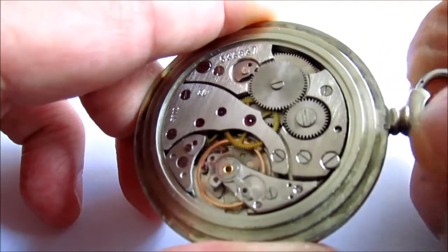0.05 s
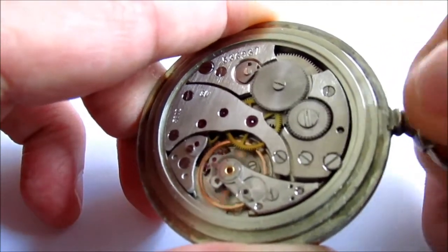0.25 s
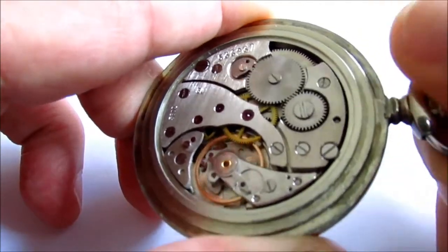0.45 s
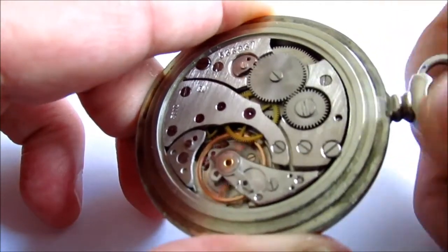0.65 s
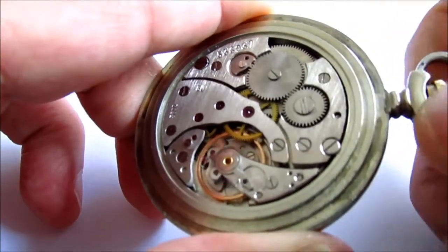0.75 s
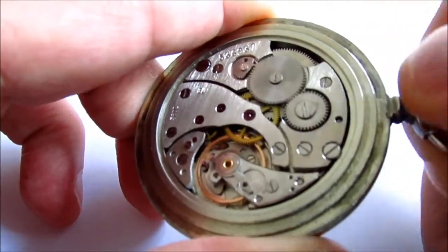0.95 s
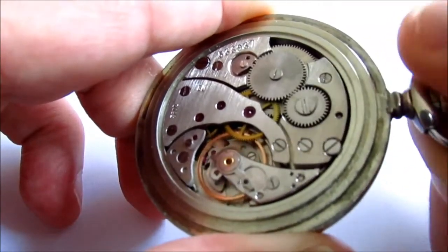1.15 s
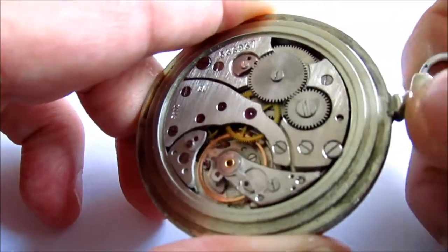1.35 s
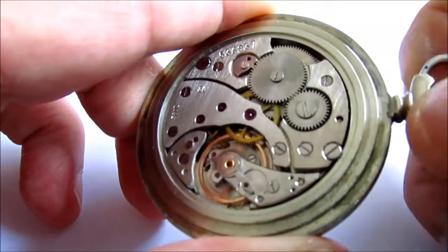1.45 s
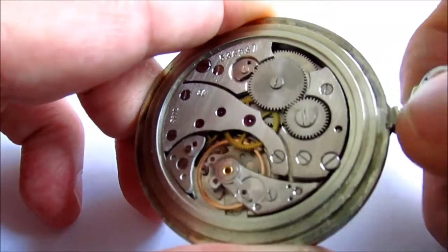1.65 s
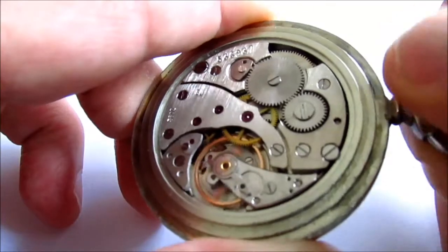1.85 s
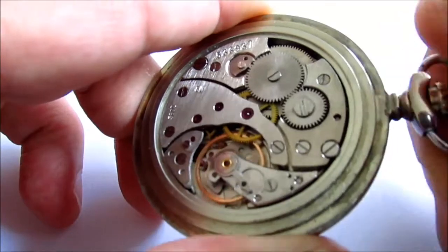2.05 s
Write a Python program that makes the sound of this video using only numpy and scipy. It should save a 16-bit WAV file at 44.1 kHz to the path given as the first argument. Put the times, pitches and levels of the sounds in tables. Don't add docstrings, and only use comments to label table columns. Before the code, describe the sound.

Rapid ratcheting clicks of a pocket watch crown being wound to and fro, close in a quiet room

```python
import sys
import numpy as np
from scipy import signal
from scipy.fft import rfft, irfft
from scipy.io import wavfile
from scipy.ndimage import uniform_filter1d

SR = 44100
rng = np.random.default_rng(int(sys.argv[2]) if len(sys.argv) > 2 else 0)


def inscribe(sig):
    pcm = np.round(np.clip(np.atleast_2d(sig).T, -1, 1) * 32767)
    wavfile.write(sys.argv[1], SR, pcm.astype(np.int16))


def nominal_scale(level):
    x = np.asarray(level, float) / 20
    return 10 ** x


N = 92610

STRIKE_LEN = 1600
LEAD_S = 0.002
PLATE_T60_S = 0.0013
RING_HZ = 6860


def rms_one(x):
    return x / np.sqrt(np.mean(x ** 2) + 1e-20)


def at_hz(points, hz):
    p = np.array(points)
    return np.interp(np.log(hz), np.log(p[:, 0]), p[:, 1])


def swell(rows):
    return nominal_scale(np.interp(np.arange(N) / SR, *np.transpose(rows)))


def butter(x, order, hz, kind):
    return signal.sosfilt(signal.butter(order, hz, kind, fs=SR, output="sos"), x)


def soft_top(x):
    return signal.sosfilt(signal.cheby2(12, 40, 16100, fs=SR, output="sos"), x)


def ring(x, hz, t60_s):
    r = nominal_scale(-60 / (t60_s * SR))
    w = 2 * np.pi * hz / SR
    return signal.lfilter([0, np.sin(w)], [1, -2 * r * np.cos(w), r * r], x)


# freq_hz, correlation [-1..1]
LIKENESS = [(60, 0.72), (125, 0.86), (250, 0.84), (500, -0.34), (1000, -0.51), (2000, 0.31), (5000, 0.71),
            (12000, 0.34)]


def coloured(spectrum, alike=None):
    hz = np.arange(1, N // 2 + 2) * SR / N
    alike = np.clip(at_hz(LIKENESS, hz) if alike is None else alike, -1, 1)
    inside = (hz > spectrum[0][0]) & (hz < spectrum[-1][0])
    mid, side = rfft(rng.standard_normal((2, N))) * nominal_scale(at_hz(spectrum, hz)) * inside
    mid = irfft(mid * np.sqrt(1 + alike), N)
    side = irfft(side * np.sqrt(1 - alike), N)
    return rms_one(np.array([mid + side, mid - side]))


# freq_hz, density_db_per_hz
AIR = [(76, -49), (130, -4.5), (377, -3), (465, -6.5), (884, -7), (1310, -13), (1600, -14.5), (2500, -23.5),
       (3250, -96), (5500, -120)]
# time_s, level_db
AIR_SWELL = [(0, 2.5), (.1, 1.5), (.3, 2), (.45, 2), (.65, 1.5), (.85, 1.5), (1, 2), (1.2, 4), (1.3, 3),
             (1.55, 4.5), (1.75, 5), (1.95, 3.5), (2.1, 5.5)]


def room_tone():
    return swell(AIR_SWELL) * nominal_scale(-55.5) * coloured(AIR)


# freq_hz, level_db, t60_s
HUM = [(58.2, -70.5, 0.3), (83, -76.5, 0.42), (106.5, -63, 0.25), (146.5, -64.5, 0.091), (359, -78.5, 0.18),
       (1593, -80.5, 0.4)]
# time_s, level_db
HUM_SWELL = [(0, -20), (.4, 4.5), (.58, -2.5), (.8, -0.5), (1.2, -3.5), (1.5, 4.5), (1.92, -5.5), (2.1, 0)]
# time_s, level_db
DEEP_SWELL = [(0, -17), (.35, -1), (.55, -2), (.78, 8), (.95, 3), (1.1, 0), (1.25, -11), (1.45, -14),
              (1.6, 0), (2.1, 3)]


def ringing_modes(modes):
    low = 0
    for hz, db, t60_s in modes:
        noise = rng.standard_normal((2, N + SR))
        low = low + nominal_scale(db) * rms_one(ring(noise, hz, t60_s))
    mid, side = butter(low, 2, 45, "high")[:, SR:]
    width_db = -23.5
    return mid + nominal_scale(width_db) * side * [[1], [-1]]


def hum():
    return swell(HUM_SWELL) * ringing_modes(HUM[1:]) + swell(DEEP_SWELL) * ringing_modes(HUM[:1])


# freq_hz, density_db_per_hz
HISS = [(1350, 2), (2300, -14.5), (3400, -7.5), (5000, -16), (6500, -10), (9500, -12), (14000, -15),
        (15950, -20)]


def hiss():
    return nominal_scale(-64.5) * coloured(HISS)


def contact(contact_s):
    lead_db, lead_rise_s = -8, 0.00043
    chatter_db, chatter_s = -16.5, 0.0012
    snap = 4.5
    even_hz = 700
    t = np.arange(STRIKE_LEN) / SR - LEAD_S
    after = np.maximum(t, 0)
    shape = after / contact_s * np.exp(1 - after / contact_s)
    shape = shape + nominal_scale(chatter_db) * np.exp(-after / chatter_s) * (t > 0)
    shape = shape + nominal_scale(lead_db) * np.exp(np.minimum(t, 0) / lead_rise_s) * (t < 0)
    push = rng.standard_normal((2, t.size)) * shape
    push[0, int((LEAD_S + contact_s) * SR)] = snap
    tones = rfft(push)
    power = uniform_filter1d(abs(tones) ** 2, size=even_hz * t.size // SR)
    return irfft(tones / np.sqrt(power), t.size)


def unit(x, width_db):
    return x / np.sqrt(np.sum(x ** 2, axis=1, keepdims=True)) * [[1], [nominal_scale(width_db)]]


# freq_hz, level_db
PLATES = [(8500, -1.5), (9500, 1), (10600, 0), (12200, 3), (13700, -2.5), (15400, -6.5)]


def strike(bright_hz, ring_db, thud_db, contact_s, case_modes):
    bright_t60_s, ring_t60_s, case_t60_s = 0.002, 0.0081, 0.0051
    off_pitch_db = 1.5
    mode_spread_db, pan_db, pan_spread_db = 1.5, -0.3, 0.8
    width_db, case_width_db = -7.5, -12
    push = contact(contact_s)

    bright = ring(push, bright_hz, bright_t60_s)
    for k, (hz, db) in enumerate(PLATES):
        db = db - off_pitch_db * abs(np.log2(hz / bright_hz)) + mode_spread_db * rng.normal()
        bright = bright + (-1) ** k * nominal_scale(db) * ring(push, hz * rng.uniform(0.89, 1.03), PLATE_T60_S)
    bright = butter(bright, 3, [7300, 16200], "band")

    case = butter(ring(push, RING_HZ * rng.uniform(1.0, 1.015), ring_t60_s), 2, 6000, "high")

    thud = 0
    for k, (hz, db) in enumerate(case_modes):
        thud = thud + (-1) ** k * nominal_scale(db + mode_spread_db * rng.normal()) * ring(push, hz, case_t60_s)
    thud = butter(thud, 2, 1500, "high")

    blow = unit(bright, width_db)
    blow = blow + nominal_scale(ring_db + 4) * unit(case, case_width_db)
    mid, side = blow + nominal_scale(thud_db + 2) * unit(thud, case_width_db)
    side = butter(side - 0.063 * mid, 1, 10000, "high")
    pan = nominal_scale((pan_db + pan_spread_db * rng.normal()) * np.array([[0.5], [-0.5]]))
    return nominal_scale(9.5) * pan * np.array([mid + side, mid - side]) / np.sqrt(np.sum(mid ** 2))


# freq_hz, level_db
CASE = [(2900, 0), (3600, 0.5), (4300, 4.5), (5400, -3.5)]


def clicks(rows, contact_s, case_modes=CASE):
    out = np.zeros((2, N + STRIKE_LEN))
    for peak_s, peak_db, bright_hz, ring_db, thud_db in rows:
        i = int((peak_s - LEAD_S - contact_s - 0.0003) * SR)
        out[:, i:i + STRIKE_LEN] += nominal_scale(peak_db) * strike(bright_hz, ring_db, thud_db, contact_s, case_modes)
    return out[:, :N]


# peak_s, peak_db
TEETH = [(0.0565, -50), (0.2717, -36), (0.2841, -35), (0.2875, -36), (0.2966, -30), (0.3038, -38),
         (0.3307, -35), (0.3332, -28), (0.3528, -33), (0.356, -35), (0.3575, -38), (0.3785, -38),
         (0.4025, -39), (0.3752, -34), (0.3997, -36), (0.453, -34), (0.4651, -40), (0.5496, -45),
         (0.6075, -27), (0.6155, -46), (0.6341, -41), (0.6428, -36), (0.6471, -27), (0.6563, -42),
         (0.6768, -36), (0.6846, -31), (0.9293, -32)]
# peak_s, peak_db
TEETH_LATE = [(0.9343, -36), (0.9375, -33), (0.9515, -29), (0.9541, -36), (0.9751, -37), (1.005, -29),
              (1.0301, -38), (1.051, -38), (1.1992, -46), (1.3161, -42), (1.3424, -37), (1.3896, -45),
              (1.4024, -45), (1.625, -45), (1.7183, -39), (1.7213, -34), (1.733, -36), (1.7431, -39),
              (1.7585, -38), (1.7861, -38), (1.8458, -36), (1.8645, -39), (2.0909, -42)]


def tooth_touches():
    bright_hz, ring_db, thud_db = 11500, -13.5, -16
    rows = [(s, db, bright_hz, ring_db, thud_db) for s, db in list(TEETH) + list(TEETH_LATE)]
    return clicks(rows, contact_s=0.00025)


# peak_s, peak_db, bright_hz, ring_db, thud_db
BACK = [(0.1138, -36.5, 11440, -14, -27), (0.5808, -26, 11500, -9, -40), (0.6052, -24.5, 11300, -8.5, -19),
        (0.6269, -23.5, 11500, -10, -23), (0.6458, -26.5, 10100, -1.5, -26), (0.6599, -28.5, 9200, -8, -34),
        (0.6817, -25.5, 11700, -13.5, -40), (0.8599, -30.5, 12600, -25, -42),
        (1.2443, -22.5, 8100, -10.5, -30), (1.2691, -24.5, 12700, -4, -14.5), (1.2854, -27, 13000, -2, -21),
        (1.302, -25, 8200, -15, -26), (1.3188, -22.5, 11100, -4, -23), (1.3391, -27.5, 11500, -16, -20),
        (1.3928, -21.5, 7700, -3, -29), (1.4935, -22.5, 11700, -7, -41), (2.0295, -36.5, 11300, -4, -9.5),
        (2.058, -42, 11800, -15, -15), (2.0934, -36, 8240, -11, -15.5)]


def pinion_skips():
    return clicks(BACK, contact_s=0.00035)


# start_s, end_s, level_db
TURNS = [
    (0.225, 0.427, -74),
    (0.59, 0.727, -61.5),
    (0.845, 1.073, -58.5),
    (1.264, 1.39, -57),
    (1.59, 1.676, -61),
    (1.694, 1.887, -55.5),
]


def rustle():
    grains_per_s, spread_db, rise_s, fall_s = 800, 4.5, 0.015, 0.047
    t = np.arange(N) / SR
    moving = 0
    for start_s, end_s, db in TURNS:
        gate = np.minimum((t - start_s) / rise_s, (end_s - t) / fall_s)
        moving = moving + nominal_scale(db) * np.clip(gate, 0, 1)
    hits = rng.random((2, N)) < grains_per_s / SR
    force = nominal_scale(spread_db * np.minimum(rng.exponential(1, (2, N)), 4))
    grains = hits * force * rng.choice([-1, 1], (2, N))
    body = 0
    for k, (hz, db) in enumerate([(RING_HZ, -2)] + list(PLATES)):
        body = body + (-1) ** k * nominal_scale(db) * ring(grains + 1e-18, hz, PLATE_T60_S)
    body = butter(body + 0.5 * body[::-1], 3, 6000, "high")
    return soft_top(moving * rms_one(body))


# peak_s, peak_db, bright_hz, ring_db, thud_db
WIND = [(0.2349, -16, 10500, -16, -51), (0.2439, -20, 10900, -10, -29), (0.2513, -12.5, 11600, -23, -44),
        (0.2599, -14.5, 12100, -27, -39), (0.2741, -17, 11500, -13, -26), (0.2938, -14, 12300, -22, -44),
        (0.3207, -14.5, 9240, -16, -46), (0.3426, -13, 12000, -31, -49), (0.3651, -14.5, 12300, -19.5, -42),
        (0.3895, -13.5, 11750, -16.5, -28), (0.9034, -18.5, 9200, -11.5, -28),
        (0.9115, -15.5, 8900, -37, -32.5), (0.9242, -14.5, 12700, -18.5, -50),
        (0.9409, -15.5, 10100, -30, -25), (0.9619, -14.5, 11800, -17, -36), (0.9935, -14, 11600, -14, -28),
        (1.0194, -14.5, 9200, -20, -25.5), (1.041, -15.5, 8470, -13.5, -24.5),
        (1.7081, -14.5, 12600, -17.5, -33), (1.7229, -18, 10500, -10, -25.5),
        (1.7353, -16.5, 12450, -27, -23), (1.7483, -22, 11100, -6, -21), (1.776, -14.5, 10700, -15, -25.5),
        (1.8357, -14, 9060, -12.5, -23)]


def ratchet_clicks():
    return clicks(WIND, contact_s=0.00016)


# peak_s, peak_db, bright_hz, ring_db, thud_db
STOPS = [
    (0.4541, -21.5, 10400, -8.5, -11.5),
    (1.1318, -21.5, 10800, -6, -8),
]
# freq_hz, level_db
STOP_CASES = [
    [(1750, 0), (2550, -0.5), (3950, 5), (5600, -12)],
    [(2600, -7), (3300, -1), (4100, -2), (5000, -8)],
]


def stem_stops():
    return sum(clicks([row], 0.0006, modes) for row, modes in zip(STOPS, STOP_CASES))


def room(x):
    t60_s, rise_s, tail_cut_hz = 0.34, 0.0029, 21600
    t = np.arange(SR // 2) / SR
    tail = rng.standard_normal((2, t.size)) * nominal_scale(-60 * t / t60_s) * np.clip(t / rise_s, 0, 1)
    tail = butter(tail, 1, tail_cut_hz, "low")
    tail = tail / np.sqrt(np.sum(tail ** 2) / 2)
    return soft_top(signal.fftconvolve(x, tail, axes=1)[:, :N])


# start_s, level_db, attack_s, t60_s
KNOCKS = [
    (1.269, -45, 0.048, 0.95),
    (1.788, -46.5, 0.038, 1.0),
]
# freq_hz, density_db_per_hz
KNOCK = [(53, -33), (90, -16), (288, -1.5), (840, -13), (1110, -11), (1600, -7), (2200, -22.5), (2860, -38),
         (4840, -120)]


def knocks():
    t = np.arange(N) / SR
    env = 0
    for start_s, db, attack_s, t60_s in KNOCKS:
        decay = nominal_scale(db - 60 * np.maximum(t - start_s, 0) / t60_s)
        env = env + decay * np.clip((t - start_s) / attack_s, 0, 1)
    return env * coloured(KNOCK, alike=0.91)


def scene():
    background = room_tone() + hum() + hiss()
    watch = tooth_touches() + pinion_skips() + rustle() + ratchet_clicks() + stem_stops()
    return background + watch + nominal_scale(-15) * room(watch) + knocks()


def roll_off(x):
    return signal.sosfilt(signal.butter(12, 17140, fs=SR, output="sos"), x)


def record(dry):
    rounded = 0.39 * np.tanh(dry / 0.39)
    mix = signal.sosfilt(signal.cheby2(10, 40, 16900, fs=SR, output="sos"), rounded)
    return roll_off(mix)


dry = scene()
out = record(dry)
inscribe(out)
```